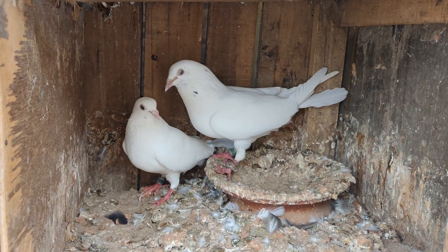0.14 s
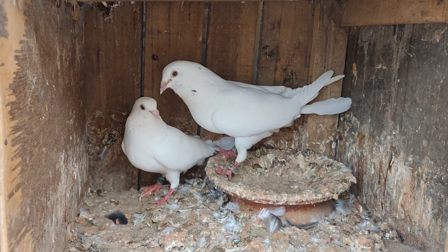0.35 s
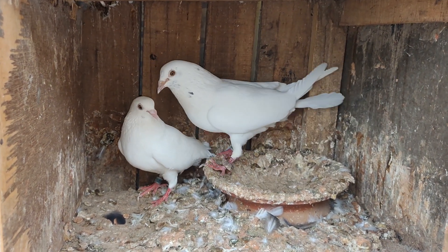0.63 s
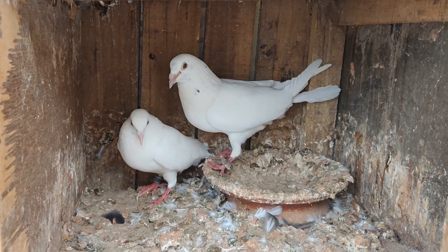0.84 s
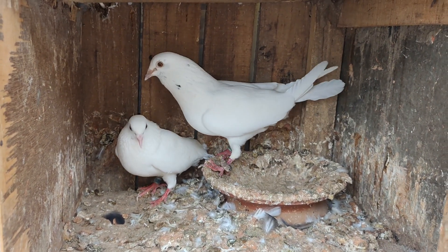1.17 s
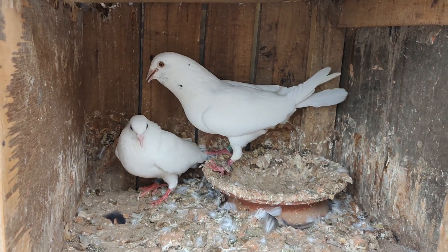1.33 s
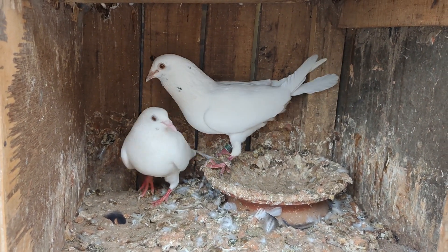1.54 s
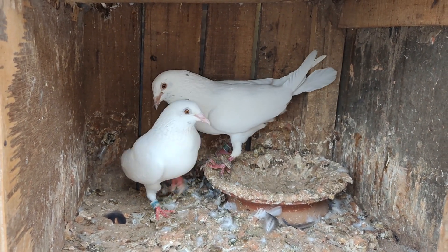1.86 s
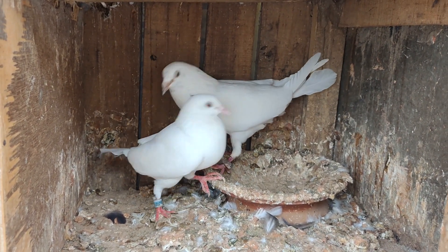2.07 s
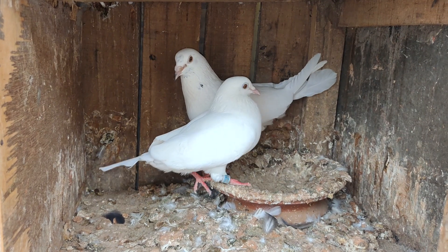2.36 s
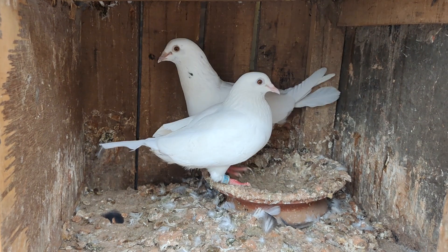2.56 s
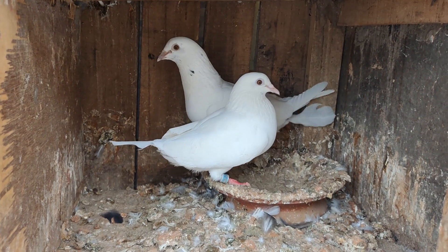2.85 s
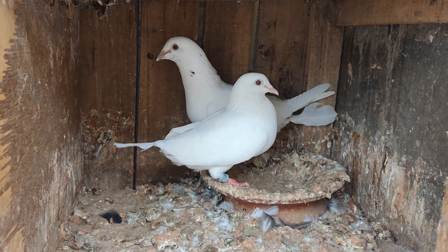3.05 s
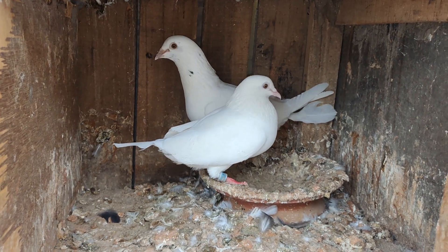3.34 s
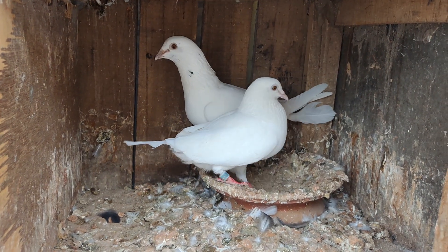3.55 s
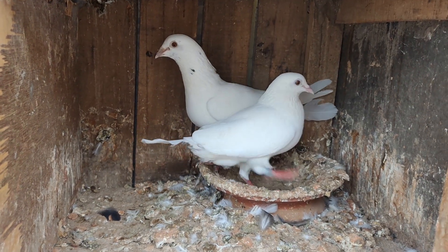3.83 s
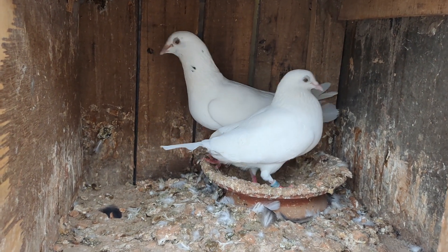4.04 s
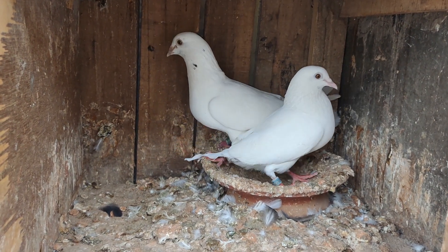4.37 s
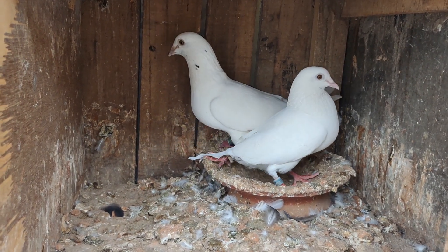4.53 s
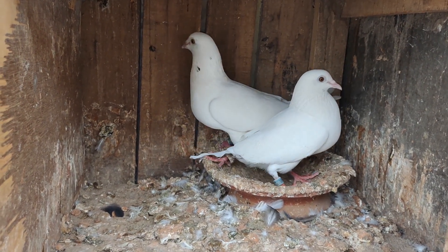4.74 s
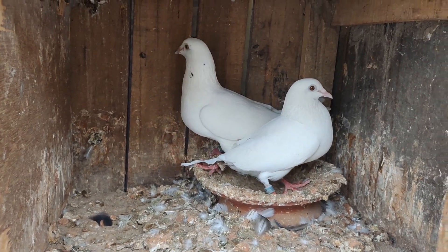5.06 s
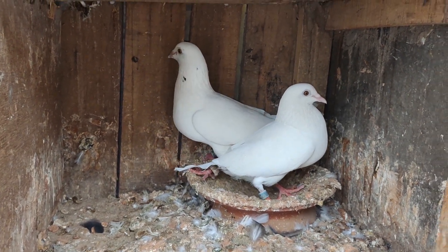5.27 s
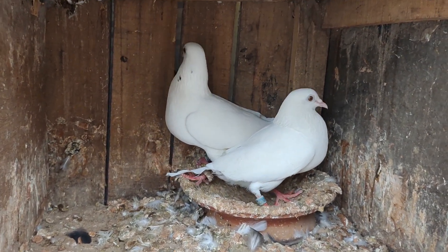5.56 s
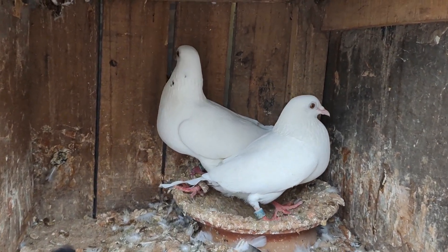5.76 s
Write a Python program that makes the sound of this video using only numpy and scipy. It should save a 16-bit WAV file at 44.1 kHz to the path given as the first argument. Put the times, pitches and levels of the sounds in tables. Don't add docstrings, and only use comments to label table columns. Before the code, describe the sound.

A near stereo microphone catches rounded, warbling pigeon calls with bubbling pulses, loudest in the opening half second and around two seconds. Dry scratches and small knocks scatter throughout. Brief high wire rattles come early, then a short hinge-like creak and thin chick-like squeaks from the left. Later coos are quieter and more separate, over low distant machinery and short boxy reflections.

```python
import sys
import numpy as np
from scipy import signal
from scipy.fft import rfft, irfft, next_fast_len
from scipy.io import wavfile
from scipy.ndimage import uniform_filter1d

SR = 44100
rng = np.random.default_rng(int(sys.argv[2]) if len(sys.argv) > 2 else 0)


def bounce(signal):
    frames = np.transpose(np.atleast_2d(signal))
    limited = np.clip(frames, -1, 1)
    pcm = np.round(limited * 32767).astype(np.int16)
    wavfile.write(sys.argv[1], SR, pcm)


def nominal_scale(level):
    x = np.asarray(level, float) / 20
    return 10 ** x


N = 260190


def rms_one(x):
    return x / np.sqrt(np.mean(x ** 2) + 1e-20)


def note(rows):
    s, *columns = np.transpose(rows)
    at = np.arange(max(int(s[0] * SR), 0), min(int(s[-1] * SR), N))
    edge_s = 0.013
    gate = np.clip(np.minimum(at - at[0], at[-1] - at) / (edge_s * SR), 0, 1)
    return at, gate, [np.interp(at / SR, s, c) for c in columns]


def at_hz(points, hz):
    points_hz, values = np.transpose(points)
    return np.interp(np.log(hz), np.log(np.maximum(points_hz, 1)), values)


def drift(rate_hz, count=N):
    settle = 2000
    r = np.exp(-40 * np.pi * rate_hz / SR)
    white = rng.standard_normal(count // 20 + settle + 2)
    slow = rms_one(signal.lfilter([1], [1, -2 * r, r * r], white))
    return np.interp(np.arange(count) / 20, np.arange(len(slow) - settle), slow[settle:])


def sweep(hz):
    return 2 * np.pi * np.cumsum(hz) / SR


def resonate(x, modes):
    out = 0
    for k, (hz, width_hz, level_db) in enumerate(modes):
        r = np.exp(-np.pi * width_hz / SR)
        poles = [1, -2 * r * np.cos(2 * np.pi * hz / SR), r * r]
        ringing = signal.lfilter([1 - r * r, 0, r * r - 1], poles, x + 1e-18) / 2
        out = out + (-1) ** k * nominal_scale(level_db) * ringing
    return out


def grains(per_s, spread_db):
    sizes = nominal_scale(spread_db * np.minimum(rng.exponential(1, N), 4)) * rng.standard_normal(N)
    return sizes * (rng.random(N) < per_s / SR)


def place(x, pan_db, late_samples=0):
    return np.array([x * nominal_scale(pan_db / 2), np.roll(x, late_samples) * nominal_scale(-pan_db / 2)])


def air():
    # frequency in Hz, density in dB per Hz.
    spectrum = [(15, -48), (25, -43), (76, 0.5), (161, -7), (256, 0), (439, -12.5), (775, -35),
                (1370, -30.5), (2690, -29), (5000, -39), (7510, -36.5), (9570, -51), (11900, -39.5),
                (14800, -39), (16000, -67)]
    # frequency in Hz, left-right correlation (-1 to 1, clipped).
    likeness = [(60, 0.81), (180, 1), (550, -1.2), (1650, -0.37), (4970, 0.28), (15000, -0.26)]
    level_db = -46 + 0.53
    edges_hz = 24 * 2 ** np.arange(0, 9.6, .5)
    together = drift(3.7)
    white = rng.standard_normal((2, 2, N))
    out = 0
    for k, (low_hz, high_hz) in enumerate(zip(edges_hz, edges_hz[1:])):
        band = signal.butter(2, [low_hz, high_hz], "band", fs=SR, output="sos")
        mid, side = signal.sosfilt(band, white[k % 2])
        hz = np.sqrt(low_hz * high_hz)
        alike = np.clip(at_hz(likeness, hz), -1, 1)
        gain = nominal_scale(at_hz(spectrum, hz) + 1.6 * together + 3.2 * drift(11.8))
        out = out + gain * (np.sqrt(1 + alike) * mid + np.sqrt(1 - alike) * side * [[1], [-1]])
    return nominal_scale(level_db) * rms_one(out)


def hum():
    # frequency in Hz, width in Hz, level in dB.
    modes = [(83.2, 4.7, 7), (116, 7.1, 6), (685, 186, -17.5)]
    # time in seconds, level in dB.
    course = [(0, -48.5), (.4, -51.5), (3.9, -50.5), (4.25, -47.5), (4.6, -53), (5.6, -49), (5.9, -55)]
    level_db = np.interp(np.arange(N) / SR, *np.transpose(course)) - 5
    return place(rms_one(resonate(rng.standard_normal(N), modes)) * nominal_scale(level_db), -0.86)


def overtones(hz, phase):
    throat_hz, width_hz = 680, 170
    second, third = (nominal_scale(-9 * ((k * hz - throat_hz) / width_hz) ** 2) for k in (2, 3))
    mix = second * np.sin(2 * phase + 1.04) + 0.33 * third * np.sin(3 * phase)
    return mix / np.hypot(second, third)


def coos():
    # time in seconds, pitch in Hz, first harmonic in dB, overtones in dB.
    near_notes = [
        [(0.24, 229.8, -50.5, -57), (0.334, 232.2, -32, -60), (0.38, 268, -42, -47)],
        [(0.3, 261.9, -31, -46), (0.448, 366, -52.5, -42.5), (0.62, 265.4, -42.5, -54)],
        [(0.65, 284.5, -38, -64), (0.724, 241, -33.5, -47.5), (0.94, 323.3, -32, -49)],
        [(1.36, 313.5, -31, -51), (1.498, 217.3, -34, -46), (1.66, 214, -55, -57)],
        [(1.74, 273.9, -42, -44), (1.85, 359.8, -44.5, -43.5), (2.04, 244, -50, -49.5)],
        [(2.04, 274.5, -31, -46), (2.1, 223.2, -40, -53), (2.32, 313.4, -26.5, -44)],
    ]
    # time in seconds, pitch in Hz, level in dB.
    far_notes = [
        [(0.0, 257, -28), (0.028, 262, -38), (0.13, 232, -48)],
        [(0.12, 331, -37), (0.174, 324.6, -37), (0.26, 229, -41)],
        [(0.5, 199.6, -58), (0.596, 263.2, -41.5), (0.67, 272, -34.5)],
        [(0.52, 337.1, -46), (0.75, 338.3, -38), (0.8, 302, -28.5)],
        [(1.06, 242.2, -57), (1.132, 288.7, -40), (1.36, 250, -44)],
        [(1.5, 233, -32), (1.572, 320.6, -45), (1.7, 253, -47.5)],
        [(2.04, 326.1, -55), (2.064, 336.4, -43), (2.22, 356, -41)],
        [(2.33, 281.8, -54), (2.7, 229.1, -45.5), (2.8, 272.3, -43)],
        [(2.9, 268, -66), (2.966, 312.0, -50), (3.32, 237.2, -43.5)],
        [(3.33, 233.3, -46), (3.48, 263.6, -42), (3.64, 172, -50.5)],
        [(3.14, 195, -49), (3.2, 211, -42.5), (3.26, 245, -41)],
        [(3.56, 439.5, -46), (3.668, 375.8, -33), (3.95, 219.8, -44.5)],
        [(3.64, 399, -38), (3.684, 399.4, -41.5), (3.92, 331.6, -54.5)],
        [(4.1, 202.5, -49), (4.55, 272.2, -42.5), (4.64, 346, -69)],
        [(4.64, 242.3, -55), (4.8, 335.3, -41), (4.95, 146.5, -47)],
        [(5.04, 232.8, -51.5), (5.186, 270.7, -44), (5.47, 195.4, -55)],
        [(5.57, 185.7, -59), (5.684, 306.3, -45.5), (5.9, 286, -52.5)],
    ]
    out = np.zeros(N)
    for rows in near_notes + far_notes:
        at, gate, (hz, level_db, *near) = note(rows)
        upper_db = near[0] if near else level_db - 29
        flutter_db = 2 if near else 3.2
        phase = sweep(hz * (1 + 0.009 * drift(32, count=len(at))))
        flutter = nominal_scale(3 + flutter_db * drift(25, count=len(at)))
        tone = nominal_scale(level_db) * np.sin(phase) + nominal_scale(upper_db) * overtones(hz, phase)
        out[at] += flutter * gate * tone
    return out


def pulses():
    # time in seconds, peak in dB, pitch in Hz, overtones in dB, length in seconds.
    puffs = [(0.026, -23.5, 265.6, -24, 0.018), (0.154, -25, 201, -18, 0.018),
             (0.267, -26.5, 231, -12.5, 0.019), (0.299, -30.5, 216, -1, 0.02),
             (0.342, -26.5, 279.4, -12, 0.024), (0.398, -21.5, 314, -13, 0.022),
             (0.485, -21, 314, -12, 0.021), (1.361, -31, 183.4, -20, 0.043),
             (1.571, -28.5, 215.4, -13.5, 0.027), (1.691, -29.5, 224, -11.5, 0.028),
             (1.725, -23, 243, -12, 0.022), (1.77, -23.5, 285, -12, 0.031), (1.832, -20.5, 330, -11, 0.019),
             (1.946, -24, 284.4, -15.5, 0.024), (2.344, -37.5, 332, -13.5, 0.015),
             (2.757, -33, 280.6, -30, 0.029), (2.843, -29.5, 287, -29.5, 0.029),
             (3.314, -34.5, 334, -33, 0.023), (3.44, -30, 285, -34, 0.015), (4.586, -27.5, 288, -33, 0.023),
             (5.717, -30.5, 264, -17.5, 0.039)]
    out = np.zeros(N)
    for s, peak_db, hz, overtones_db, length_s in puffs:
        u = np.linspace(0, 1, int(length_s * SR))
        phase = 2 * np.pi * hz * length_s * (u - 0.07 * (u * u - u))
        tone = np.sin(phase) + nominal_scale(overtones_db + 4.5) * overtones(hz, phase)
        swell = np.sin(np.pi * u ** 0.68) ** 0.69
        i = int((s - .004) * SR)
        out[i:i + len(u)] += nominal_scale(peak_db + 1.0) * swell * tone
    return out


def birds():
    # time in seconds, left-right level in dB.
    side = [(0, 1.5), (.7, -1.5), (1.2, 3), (1.8, -3.5), (2.7, 3), (4.2, 2), (5.9, -2)]
    pan_db = np.interp(np.arange(N) / SR, *np.transpose(side))
    return place(coos() + pulses(), pan_db)


def mesh():
    # time in seconds, upper wires in dB, lower wires in dB.
    rattles = [
        [(0.06, -77, -99), (0.166, -46, -56.5), (0.38, -70, -73.5)],
        [(0.62, -85, -84), (0.69, -38.5, -50.5), (0.87, -79.5, -94)],
        [(1.81, -72, -81), (1.888, -40.5, -46), (2.0, -77, -66)],
        [(2.24, -79, -72), (2.274, -61, -84), (2.3, -84, -85)],
    ]
    # frequency in Hz, width in Hz, level in dB.
    upper_wires = [(9220, 170, 4), (9880, 83, 19.5), (10320, 49, 1.5), (10950, 170, -11)]
    lower_wires = [
        [(6720, 99, -3), (7300, 82, -12), (8200, 140, -13)],
        [(7500, 26, 8), (6600, 49, -19), (8400, 80, -20)],
    ]
    strand_modes = [(11540, 55, 4), (11650, 120, -12.5), (11400, 80, 2)]
    # start in seconds, level in dB, length in seconds.
    tinkles = [(1.234, -55, 0.068), (2.835, -65, 0.27), (3.372, -47.5, 0.12), (3.84, -59, 0.11),
               (4.092, -65, .08), (4.497, -58.5, 0.23), (5.063, -65, 0.14), (5.58, -57.5, 0.16)]
    out, shake = np.zeros(N), grains(810, spread_db=7.0)
    upper = rms_one(resonate(shake, upper_wires))
    lowers = [rms_one(resonate(shake, modes)) for modes in lower_wires]
    for k, rows in enumerate(rattles):
        at, gate, (upper_db, lower_db) = note(rows)
        out[at] += gate * (nominal_scale(upper_db - 1.7) * upper[at] + nominal_scale(lower_db - 0.7) * lowers[k // 2][at])
    bouts = np.zeros(N)
    for s, level_db, length_s in tinkles:
        count = int(length_s * SR)
        bouts[int(s * SR):][:count] += nominal_scale(level_db) * np.hanning(count)
    strand = rms_one(resonate(grains(340, spread_db=7), strand_modes)) * bouts
    return place(out, -13.5) + place(strand, -1.1, late_samples=11)


def knocks():
    # time in seconds, scratch in dB, board in dB, claw in dB.
    contacts = [(0.1375, -46, -66, -72), (0.1605, -41, -56, -57), (0.2375, -35, -74, -49),
                (0.492, -44.5, -71, -58), (0.629, -42.5, -70, -55), (0.6794, -30, -66.5, -83),
                (0.7218, -36.5, -72, -62), (0.779, -48, -65, -43.5), (0.9614, -66, -68, -56),
                (1.299, -45.5, -78, -69), (1.424, -40, -56, -68), (1.4514, -53, -57, -75),
                (1.5888, -27.5, -55.5, -39.5), (1.6638, -40, -74, -47), (1.7704, -40.5, -70, -40),
                (1.8827, -36, -72, -36.5), (2.3045, -45, -75, -73), (2.375, -39, -75, -60),
                (2.4094, -57, -80, -56), (2.444, -36.5, -73, -52), (2.777, -44.5, -71, -42.5),
                (2.9146, -43.5, -64, -39.5), (3.061, -34, -66.5, -40), (3.14, -57, -58.5, -46.5),
                (3.3005, -42, -67, -44), (3.3213, -44, -66.5, -59), (3.362, -42, -77, -57),
                (3.4283, -38.5, -71, -56), (3.5246, -44, -55.5, -41), (3.704, -49, -67, -62),
                (3.8676, -41.5, -73, -73), (3.939, -60, -56.5, -51), (4.0216, -43, -83, -51.5),
                (4.2148, -52, -56.5, -46), (4.4984, -47.5, -63, -54), (4.7471, -72, -61, -70),
                (4.8718, -41, -73, -58), (5.2084, -52, -69.5, -46), (5.2829, -49.5, -83, -77),
                (5.3861, -70, -55, -68), (5.4148, -39, -82, -57), (5.7493, -55, -51, -53),
                (5.7843, -46, -77, -51)]
    # frequency in Hz, width in Hz, level in dB.
    scratch_modes = [(5620, 1840, 3), (6320, 1130, 7.5), (7430, 400, 3.5), (9850, 2800, -4),
                     (11600, 2400, -2.5), (15700, 2600, -10.5)]
    board_modes = [(667, 84, -7), (926, 67, 1.5), (1254, 750, -12)]
    claw_modes = [(1900, 740, -0.5), (2625, 120, 9), (2990, 130, 3.5), (3900, 830, -7.5)]
    out, grit = np.zeros(N), grains(3000, spread_db=0.0)
    scratch, board, claw = [rms_one(resonate(grit, m)) for m in (scratch_modes, board_modes, claw_modes)]
    for s, scratch_db, board_db, claw_db in contacts:
        t60_s = 0.051 + 0.045 * rng.random()
        t = np.arange(int(t60_s * SR)) / SR
        at = int(s * SR) + np.arange(len(t))
        shape = nominal_scale(-60 * t / t60_s) * (1 - np.exp(-t / (.04 * t60_s)))
        burst = nominal_scale(scratch_db - 5) * scratch[at]
        burst += nominal_scale(board_db + 15) * board[at]
        burst += nominal_scale(claw_db - 1.5) * claw[at]
        out[at] += burst * shape
    return place(out, 6.7, late_samples=11)


def creak():
    # time in seconds, slips per second, level in dB, resonance in Hz.
    hinge = [
        (0.94, 251.5, -49.5, 2350),
        (1.058, 282.2, -37.5, 2610),
        (1.15, 281.5, -59, 3000),
    ]
    out = np.zeros(N)
    at, gate, (per_s, level_db, peak_hz) = note(hinge)
    uneven = np.linspace(.1, 1, len(at)) ** 2.9
    phase = sweep(per_s * (1 + 0.036 * uneven * drift(58.5, count=len(at))))
    width_hz = 330 + 250 * uneven
    for k in np.arange(12, 30) / 2:
        share = uneven if k % 1 else 1
        colour_db = -9 * ((k * per_s - peak_hz) / width_hz) ** 2
        rough_db = 15 * uneven * drift(40, count=len(at))
        out[at] += share * nominal_scale(colour_db + rough_db) * np.cos(k * phase)
    evened = out[at] / np.sqrt(uniform_filter1d(out[at] ** 2, size=1200) + 1e-9)
    out[at] = evened * nominal_scale(level_db - 0.2) * gate
    return place(out, 10.5, late_samples=17)


def squeaks():
    # time in seconds, pitch in Hz, level in dB.
    whistles = [
        [(1.115, 4020, -84), (1.141, 3135, -44), (1.3, 2980, -97)],
        [(1.15, 2280, -48), (1.168, 2155, -43), (1.45, 2185, -91)],
        [(1.41, 3240, -64), (1.476, 3540, -64.5), (1.53, 3580, -67)],
        [(1.425, 4000, -66), (1.529, 4205, -65), (1.57, 3940, -57)],
        [(1.5, 3900, -72), (1.53, 3960, -61), (1.56, 3900, -65)],
        [(2.15, 3330, -81.5), (2.5, 3330, -74), (2.76, 3330, -73.5)],
        [(3.86, 4880, -81), (3.89, 4680, -68.5), (3.94, 4700, -85)],
        [(4.17, 4194, -82), (4.218, 4060, -65.5), (4.49, 4690, -72)],
        [(4.2, 3620, -75), (4.408, 4040, -59.5), (4.5, 3704, -73)],
    ]
    out = np.zeros(N)
    for rows in whistles:
        at, gate, (hz, level_db) = note(rows)
        phase = sweep(hz * (1 + 0.011 * drift(84, count=len(at))))
        hoarse = nominal_scale(level_db + 5.5 + 3.8 * drift(39, count=len(at)))
        out[at] += hoarse * gate * (np.sin(phase) + 0.028 * np.sin(2 * phase))
    return place(out, 15.7, late_samples=12)


def loft(x):
    t60_s, wall_cut_hz = 0.42, 4800
    size = next_fast_len(N + SR)
    turn = np.exp(-2j * np.pi * np.arange(size // 2 + 1) / size)
    dull = np.exp(-2 * np.pi * wall_cut_hz / SR)
    wall = (1 - dull) / (1 - dull * turn)
    out = np.zeros((2, size // 2 + 1), complex)
    for k, lag in enumerate((rng.uniform(0.012, .04, 12) * SR).astype(int)):
        loop = nominal_scale(-60 * lag / SR / t60_s) * wall * turn ** lag
        out[k % 2] += (-1) ** (k // 2) * loop / (1 - loop)
    return irfft(out * rfft(x, size), size)[:, :N]


def scene():
    flock, clatter, calls = birds(), mesh() + knocks(), creak() + squeaks()
    wet = nominal_scale(-18.5) * flock + nominal_scale(-11) * clatter + nominal_scale(-10) * calls
    return flock + clatter + calls + loft(wet.mean(axis=0)) + air() + hum()


def top_cut(x):
    return signal.sosfilt(signal.butter(12, 16440, fs=SR, output="sos"), x)


def record(dry):
    low_pass = signal.cheby2(14, 60, 16100, fs=SR, output="sos")
    mix = signal.sosfilt(low_pass, dry)
    return top_cut(mix)


dry = scene()
out = record(dry)
bounce(out)
```